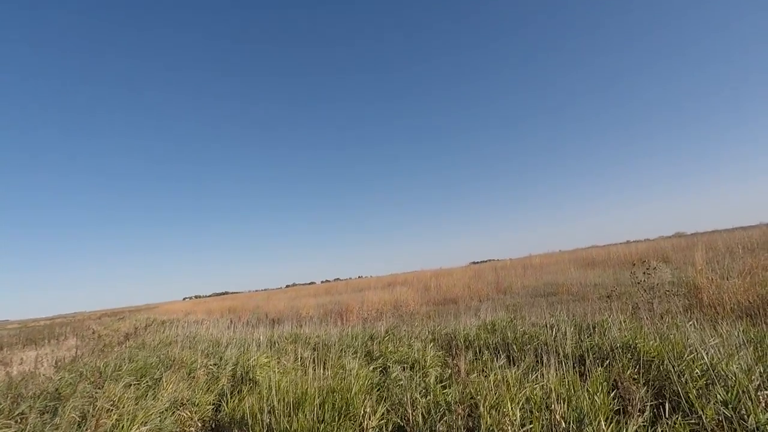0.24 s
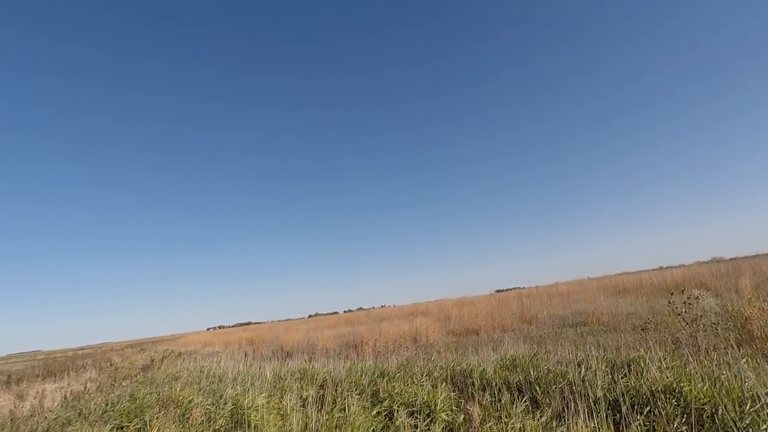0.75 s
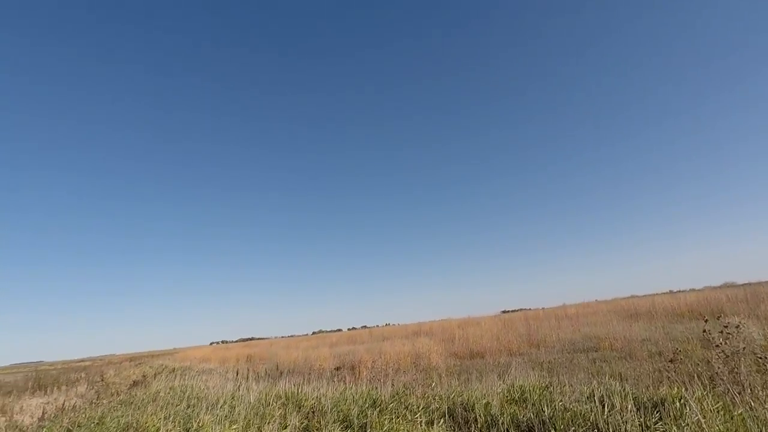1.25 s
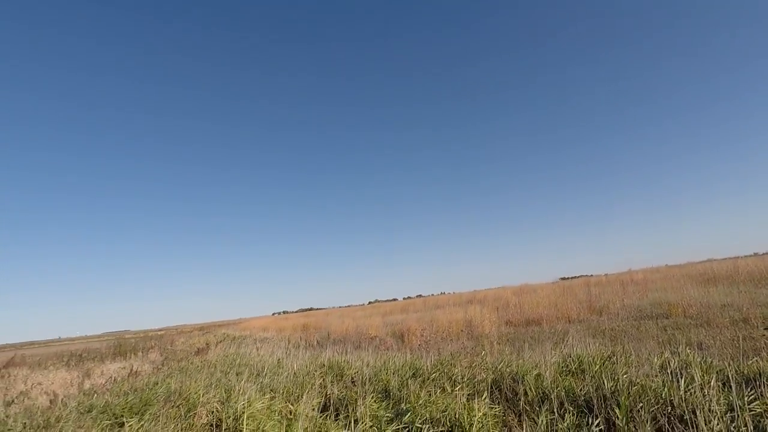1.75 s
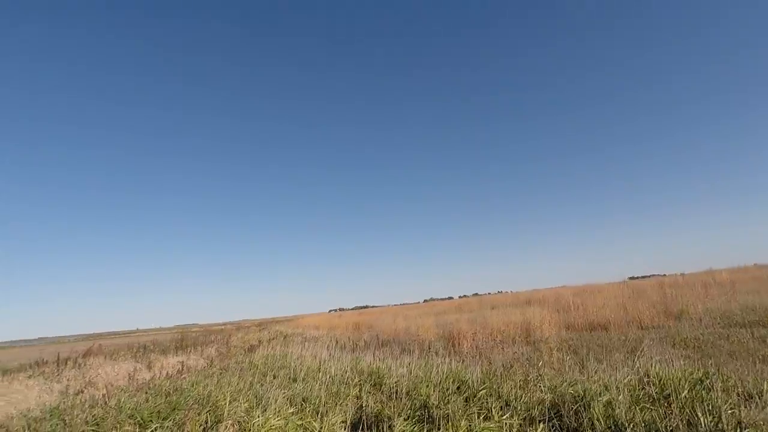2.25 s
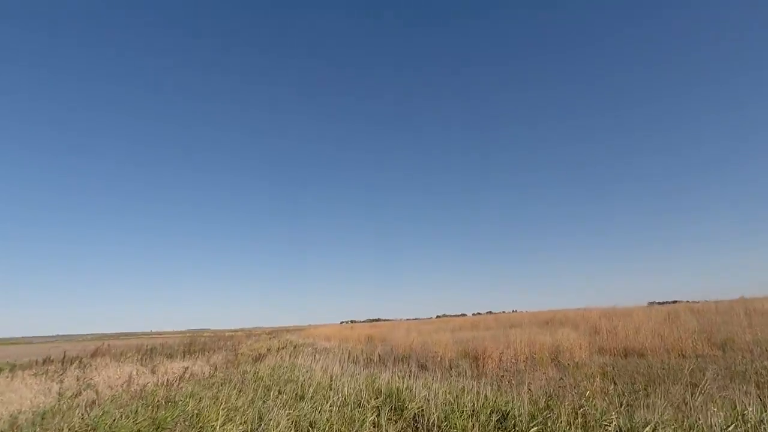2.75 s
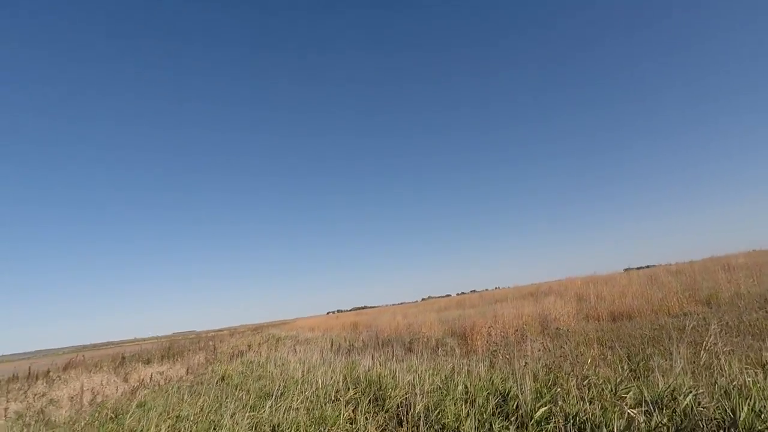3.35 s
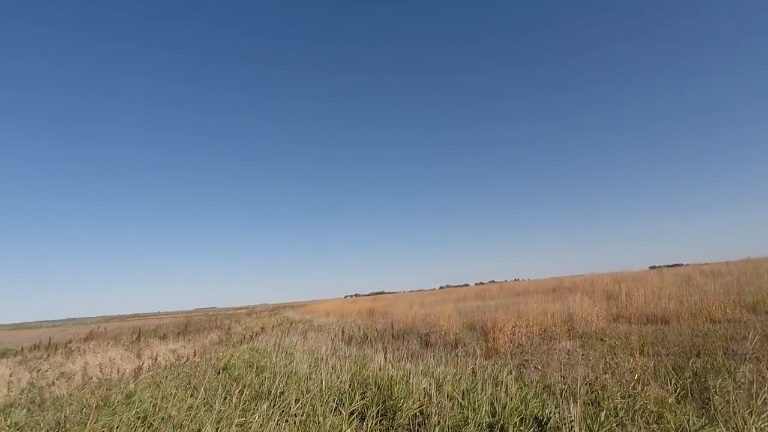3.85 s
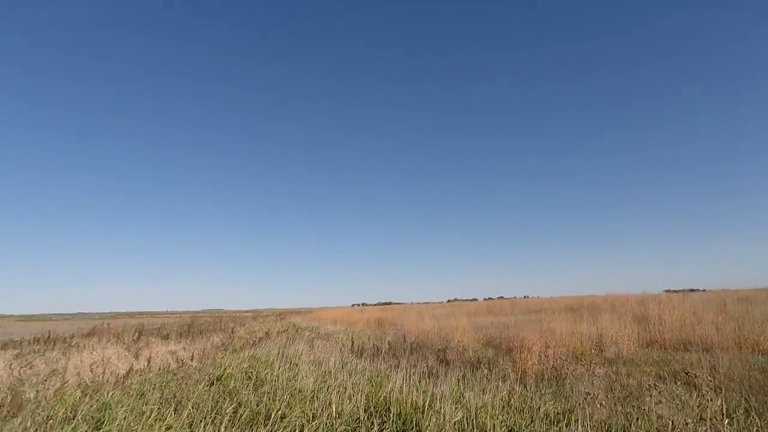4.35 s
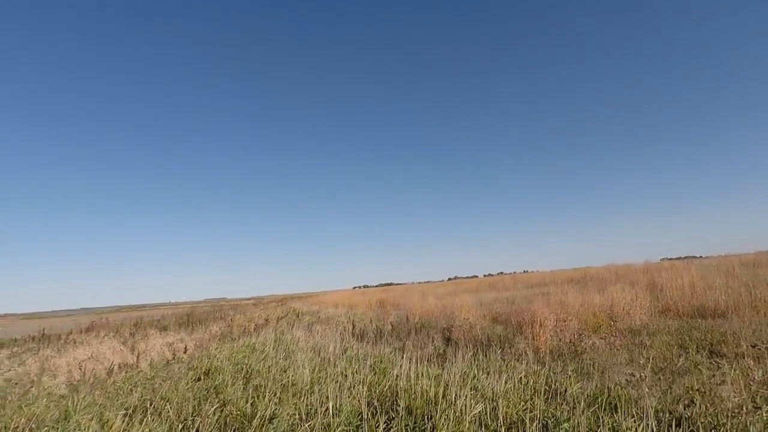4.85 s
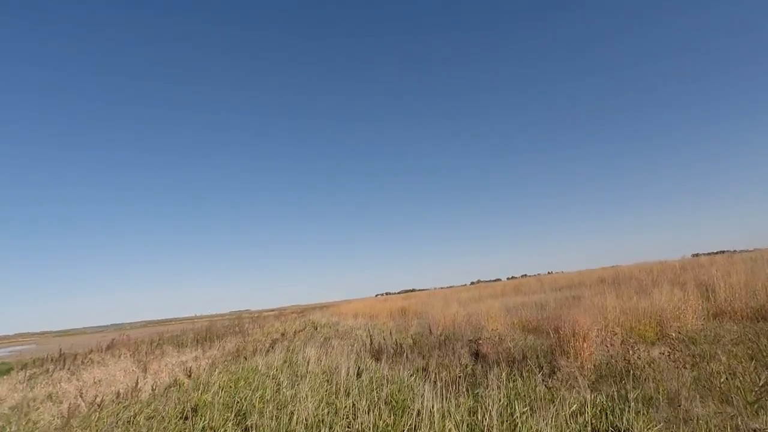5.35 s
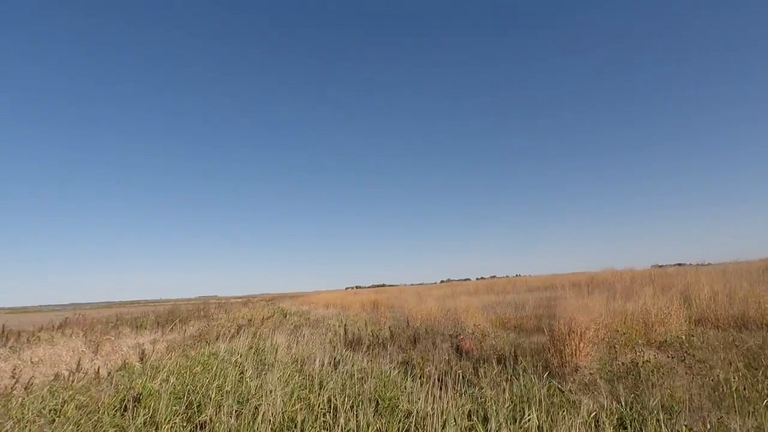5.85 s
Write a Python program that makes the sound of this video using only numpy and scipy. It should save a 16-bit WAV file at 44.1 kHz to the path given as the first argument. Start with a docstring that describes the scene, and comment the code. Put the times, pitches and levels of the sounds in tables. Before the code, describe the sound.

A person wades through tall dry grass in an open field, with a carried camera's microphone very close. Deep, soft-edged thuds mark heavy steps about every 0.8 seconds, each with a faint crunch of stems. Thin, crisp rustling never stops and swells as legs brush tufts between steps. Low gusts rumble and flutter on the microphone, its mount knocks dully, and occasional stalks snap. Dry, no echo.

```python
"""Tall dry grass rustles without pause over a low rumble of air as someone wades through an open field.
Random contacts, coloured by spectra, make blades, tips, stalks and litter; each leg brush swells them.
Gusts lift the rumble, flutter and whoosh of noise. Damped cosines knock the carried camera in its mount
and thud with each footfall, which also crunches dry stems; stalks snap as short bands of noise. No echo."""
import sys
import numpy as np
from scipy import signal
from scipy.fft import rfft, irfft, next_fast_len
from scipy.io import wavfile
from scipy.ndimage import uniform_filter1d

SR = 44100
rng = np.random.default_rng(int(sys.argv[2]) if len(sys.argv) > 2 else 0)


def transcribe(signal):
    """Save signal, clipped to [-1, 1], as a 16-bit WAV file at the path in sys.argv[1]."""
    frames = np.atleast_2d(signal).T
    limited = np.clip(frames, -1, 1)
    pcm = np.round(limited * 32767).astype(np.int16)
    wavfile.write(sys.argv[1], SR, pcm)


N = 268921
T = np.arange(N) / SR

# Thickness of growth along the path. Each row: time in s, level of its steady blade rustle in dB.
GROWTH = [(0, -69), (.35, -69.5), (1.3, -67.5), (2, -67.5), (2.75, -65), (3.65, -66), (4.4, -66),
          (5.4, -67.5), (6.1, -68)]
# Footfalls. Each row: full weight in s, thud peak in dB, thud pitch in Hz, build-up in s, settling in s,
# heel knock in dB, sole bump in dB, crunch in dB.
STEPS = [(1.044, -4, 32.5, 0.024, 0.026, -26.5, -30.5, -60.5),
         (1.895, -10, 33, 0.027, 0.013, -23, -34, -67),
         (2.011, -16.5, 30, 0.037, 0.041, -29.5, -39.5, -61.5),
         (2.611, -3, 31.4, 0.022, 0.025, -21, -38, -56), (3.438, -3, 34.1, 0.025, 0.032, -21, -32.5, -54.5),
         (4.236, -4.5, 28.2, 0.02, 0.026, -23, -35.5, -59.5),
         (4.282, -10.5, 38, 0.0068, 0.02, -33, -35, -61),
         (5.088, -3, 33.3, 0.024, 0.035, -22.5, -32.5, -56),
         (5.884, -6.5, 27.5, 0.028, 0.044, -30, -29, -66)]
# Spectrum of flutter and sole bump. Each row: frequency in Hz, density in dB per Hz.
FLUTTER = [(35, -7.5), (60, 10.5), (85, -3.5), (120, -9), (160, -15), (215, -24), (500, -34), (1000, -41.5)]


def undb(db):
    """Decibels to gain."""
    return 10 ** (np.asarray(db) / 20)


def curve(rows):
    """Each column of a timed table, interpolated at every sample."""
    s, *columns = np.transpose(rows)
    return [np.interp(T, s, c) for c in columns]


def colour(x, points):
    """Give x a spectrum of (Hz, dB) points, with 12 dB per octave more fall outside them; rms 1."""
    size = next_fast_len(N)
    hz, db = np.transpose(points)
    f = np.maximum(np.fft.rfftfreq(size, 1 / SR), 1)
    gain = undb(np.interp(np.log(f), np.log(hz), db))
    skirts = np.minimum(f / hz[0], 1) ** 2 * np.minimum(hz[-1] / f, 1) ** 2
    y = irfft(rfft(x, size) * gain * skirts, size)[:N]
    return y / np.std(y)


def walk(rate_hz):
    """Smooth random drift that changes about rate_hz times a second; spread 1."""
    k = max(int(SR / rate_hz), 1)
    held = rng.standard_normal(N)[np.arange(N) // k]
    y = uniform_filter1d(held, k)
    return y / np.std(y)


def crackle(per_s, spread_db):
    """Tiny contacts at random moments, a few stronger than the rest."""
    hit = rng.random(N) < per_s / SR
    sign = rng.choice([-1, 1], N)
    strength = undb(spread_db * np.minimum(rng.exponential(size=N), 5))
    return hit * sign * strength


def swell(at_s, rise_s, fall_s):
    """A smooth Gaussian hump that peaks at the given time."""
    return np.exp(-((T - at_s) / np.where(T < at_s, rise_s, fall_s)) ** 2)


def eddies(points, hold_s):
    """Turbulent pressure whose strength is evened out over stretches longer than hold_s."""
    y = colour(rng.standard_normal(N), points)
    local_power = uniform_filter1d(y ** 2, int(hold_s * SR))
    return y / np.sqrt(local_power + 0.0013)


def sweep():
    """Levels in dB of blades, stalks and tips: the steady rustle of wading, and a swell for each brush."""
    # Legs brushing tufts. Each row: fastest moment in s, rise in s, fall in s, swish in dB,
    # stalk rub relative to it in dB, tip hiss relative to it in dB; grass() trims the last two.
    brushes = [(.07, .05, 0.067, -73.5, -2, 4), (.51, .07, 0.045, -69.5, 2.5, -7),
               (.8, 0.22, 0.083, -62, 0.5, -6), (1.02, 0.32, .07, -68, 2.5, 1),
               (1.62, 0.15, 0.16, -64.5, 5, 2.5), (1.83, 0.083, 0.067, -66.5, 2, 2.5),
               (2.105, 0.044, 0.059, -63.5, 6, -3), (2.34, 0.2, 0.18, -60.5, -2, -6.5),
               (3.1, .13, 0.25, -64.5, 4.5, -1), (3.41, .08, 0.083, -65, 2, -3),
               (3.7, 0.081, 0.045, -67.5, -5, -4), (3.87, 0.036, .04, -64.5, 0, -3),
               (4.02, 0.12, 0.21, -60, -5, -5.5), (4.645, 0.1, 0.078, -60.5, 2, -8),
               (4.84, 0.15, 0.11, -60.5, -5, -8.5), (5.04, 0.12, 0.11, -63.5, 0.5, -3),
               (5.669, 0.14, 0.14, -59.5, -3.5, -5), (5.9, 0.19, 0.16, -63.5, -10, -6)]
    growth_rub_db, growth_tips_db = 2.63, 0.05  # relative to the steady blades, before the same trims
    growth_db, = curve(GROWTH)
    humps = np.array([swell(at, rise, fall) ** 2 for at, rise, fall, *_ in brushes])
    swish_db, rub_db, tips_db = np.transpose(brushes)[3:]
    parts = [(growth_db, swish_db),
             (growth_db + growth_rub_db, swish_db + rub_db),
             (growth_db + growth_tips_db, swish_db + tips_db)]
    # powers add
    return [10 * np.log10(undb(steady) ** 2 + undb(peaks) ** 2 @ humps) for steady, peaks in parts]


def grass(swish_db, rub_db, tips_db):
    """Blades, tips and stalks scrape along the legs, with more contacts in a faster sweep."""
    # Spectra of blades, dry tips and stalks. Each row: frequency in Hz, density in dB per Hz.
    blade_spectrum = [(2500, -21), (4500, -18), (5600, 0), (6500, -1), (7700, -3), (8700, -12.5),
                      (10000, -22), (13000, -44)]
    tip_spectrum = [(6500, -11), (8500, -4), (9400, -3.5), (10400, -4), (11200, -9), (12500, -9.5),
                    (13700, -5.5), (14500, -11), (15300, -7.5)]
    stalk_spectrum = [(1500, -17), (2400, -14), (3000, -6), (3600, -1), (4500, -1.5), (5300, -6.5),
                      (7000, -15.5)]
    tips_trim_db, rub_trim_db = 2.5, -0.15
    speed = undb(swish_db - swish_db.max())
    blades = colour(crackle(per_s=2500 + 14000 * speed, spread_db=2.5), blade_spectrum)
    tips = colour(crackle(per_s=3000 + 14000 * speed, spread_db=1.0), tip_spectrum)
    stalks = colour(crackle(per_s=1500 + 7000 * speed, spread_db=2.0), stalk_spectrum)
    # tufts catch and slip, so the sweep is never quite even
    catch_db = 0.5 * walk(30)
    return (blades * undb(swish_db + catch_db + 0.8 * walk(30))
            + tips * undb(tips_db + catch_db + tips_trim_db)
            + stalks * undb(rub_db + catch_db + rub_trim_db + 0.53 * walk(25)))


def litter(rub_db):
    """Flattened dry stems shift, more as stalks drag over them; some spring back after heavy steps."""
    # Spectra of shifting litter and rebounding stems. Each row: frequency in Hz, density in dB per Hz.
    litter_spectrum = [(150, 2), (300, -1.5), (500, -1.5), (1000, -1), (1500, -1), (2000, 0), (2700, -1),
                       (3500, -11.5), (6000, -22)]
    rebound_spectrum = [(700, -14.5), (1500, -4.5), (2300, -5.5), (2800, -3.5), (3300, -21.5), (5000, -13)]
    litter_db, drag_db = 1, -9.5  # relative to the steady rustle, and to the dragging stalks
    rebound_db = -61.0  # relative to the thud
    growth_db, = curve(GROWTH)
    stir = np.hypot(undb(growth_db + litter_db), undb(rub_db + drag_db))
    shifting = colour(crackle(per_s=3000, spread_db=0.5), litter_spectrum) * stir * undb(1.0 * walk(27))
    releases = [undb(thud_db + rebound_db) * swell(at + .11, 0.084, 0.14) for at, thud_db, *_ in STEPS]
    rebounding = colour(crackle(per_s=1700, spread_db=1.5), rebound_spectrum)
    return shifting + np.max(releases, axis=0) * rebounding


def air():
    """Slow eddies rumble on the microphone, more in gusts; flutter and whoosh rise with them."""
    # Gusts, mostly as the body swings into the next step.
    # Each row: start in s, end in s, rumble in dB, added in power to the breeze.
    gusts = [(0.14, 0.401, -30.5), (.74, .87, -37.5), (1.153, 1.42, -36), (1.493, 1.81, -39.5),
             (2.153, 2.384, -33.5), (2.415, 2.893, -31.5), (3.003, 3.067, -26.5), (3.23, 3.367, -24.5),
             (3.52, 3.735, -37), (3.857, 4.083, -35.5), (4.122, 4.41, -30.5), (4.795, 5.172, -32),
             (5.44, 5.627, -38), (5.708, 6.034, -31.5)]
    # Spectra of rumble and whoosh. Each row: frequency in Hz, density in dB per Hz.
    rumble_spectrum = [(10, -51), (20, -9), (32, 1), (45, -5.5), (60, -10), (85, -39), (150, -57)]
    whoosh_spectrum = [(200, -1.5), (330, -1), (600, -7), (1200, -15)]
    breeze_db, gust_edge_s = -40.5, 0.026
    whoosh_db = -41.5  # relative to the rumble
    power = undb(breeze_db) ** 2
    for start, end, db in gusts:
        outside_s = T - np.clip(T, start, end)
        gust = undb(db) * np.exp(-(outside_s / gust_edge_s) ** 2)
        power = power + gust ** 2
    rumble_db = 10 * np.log10(power) + 1.13 * walk(24)
    flutter_db = -56 + 0.43 * (rumble_db - breeze_db) + 1.4 * walk(15)
    rumble = eddies(rumble_spectrum, hold_s=.06) * undb(rumble_db)
    flutter = eddies(FLUTTER, hold_s=0.0526) * undb(flutter_db)
    whoosh = colour(rng.standard_normal(N), whoosh_spectrum) * undb(rumble_db + whoosh_db + 1.3 * walk(40))
    return rumble + flutter + whoosh


def knock(at_s, db, hz):
    """A heavily damped jolt of about one cycle."""
    return undb(db) * swell(at_s, 0.45 / hz, 0.83 / hz) * np.cos(2 * np.pi * hz * (T - at_s))


def knocks():
    """The camera shifts in its mount with the stride."""
    # Each row: time in s, peak in dB, pitch in Hz.
    mount_shifts = [(0.256, -30, 64), (0.291, -28.5, 92), (.84, -37, 78), (1.524, -34.5, 74.6),
                    (1.947, -28, 79), (2.035, -36, 77.5), (2.468, -27.5, 61), (2.719, -22, 52.4),
                    (2.997, -22.5, 56.5), (3.242, -26.5, 55.3), (3.328, -28.5, 83), (4.019, -34, 76),
                    (4.338, -27.5, 87.5), (4.912, -33.5, 84.5), (4.984, -28.5, 66.5), (5.162, -26.5, 54.4),
                    (5.683, -31, 74.5), (5.805, -34.5, 77.5), (5.958, -22, 52.6)]
    return sum(knock(at, db, hz) for at, db, hz in mount_shifts)


def snaps():
    """A dry stalk gives way in a short burst of splintering fibres; one breaks under every footfall."""
    # Stalks that snap or scuff. Each row: time in s, level in dB, centre in Hz, decay in s.
    stalk_breaks = [(0.2768, -51, 3620, 0.0036), (0.278, -52, 9700, 0.0088), (.39, -65, 400, 0.03),
                    (1.876, -55, 1900, 0.007), (1.936, -57, 1400, 0.0069), (2.236, -51.5, 3870, .012),
                    (2.432, -58, 3600, 0.0058), (2.47, -57, 1690, 0.013), (2.98, -60, 800, 0.039),
                    (3.353, -49, 2560, 0.0038), (3.5372, -46.5, 1000, 0.0048), (3.575, -59.5, 1400, 0.05),
                    (3.824, -56, 1500, 0.0054), (4.032, -53.5, 2110, 0.0074), (4.478, -57.5, 1490, 0.009),
                    (5.854, -49, 1600, 0.0053)]
    # a stem under the full weight; level relative to the thud
    break_db, break_lag_s, break_hz, break_decay_s = -49, .005, 1750, 0.0053
    underfoot = [(at + break_lag_s, thud_db + break_db, break_hz, break_decay_s)
                 for at, thud_db, *_ in STEPS]
    out = np.zeros(N)
    t = T[:SR // 5]
    for at, db, hz, decay in underfoot + stalk_breaks:
        edges_hz = np.clip([hz / 1.7, hz * 1.7], 100, .45 * SR)  # about an octave and a half
        band = signal.butter(2, edges_hz, "band", fs=SR, output="sos")
        fibres = signal.sosfilt(band, rng.standard_normal(len(t)))
        burst = undb(db) * fibres / np.std(fibres) * np.exp(-t / decay)
        start = int(at * SR)
        out[start:start + len(t)] += burst[:N - start]
    return out


def footfalls(heel_hz=70):
    """The heel knocks, the body's weight swings the camera slowly, and the sole flattens dry stems."""
    # Spectrum of crushed litter. Each row: frequency in Hz, density in dB per Hz.
    crunch_spectrum = [(150, -3), (280, -6.5), (500, 0.5), (900, -4.5), (1600, -2.5), (2600, -7),
                       (4000, -24), (9000, -13.5)]
    bump = eddies(FLUTTER, hold_s=0.038)
    stems = colour(crackle(per_s=3000, spread_db=3.5), crunch_spectrum)
    out = np.zeros(N)
    for at, thud_db, hz, rise, fall, heel_db, bump_db, crunch_db in STEPS:
        # the heel meets the ground half a swing before the full weight arrives
        out += knock(at - .5 / hz, heel_db, heel_hz)
        out -= undb(thud_db) * swell(at, rise, fall) * np.cos(2 * np.pi * hz * (T - at))
        out += undb(bump_db) * swell(at, 0.013, 0.018) * bump
        out += undb(crunch_db) * swell(at - .007, 0.03, 0.04) * stems
    return out


def scene():
    """All sources are close by, with no walls to answer them."""
    swish_db, rub_db, tips_db = sweep()
    growth = grass(swish_db, rub_db, tips_db) + litter(rub_db)
    return (growth + air() + knocks() + snaps() + footfalls())[None]


def record(dry):
    """The microphone port carves dips and peaks into the treble, and the recorder cuts the top."""
    # Port resonances. Each row: centre in Hz, width in Hz, gain in dB.
    port = [(1475, 74, 3.5), (2516, 154, 4), (2820, 114, -1), (3180, 58, -5.5), (3530, 275, 3),
            (4130, 190, -2), (4490, 140, 2.5), (5085, 203, -5.5), (6850, 120, -3.5), (8700, 440, -3),
            (9400, 240, 1.5)]
    top_hz = 15350
    size = next_fast_len(N + SR // 10)
    f = np.fft.rfftfreq(size, 1 / SR)
    port_db = sum(db * np.exp(-((f - hz) / width) ** 2) for hz, width, db in port)
    heard = irfft(rfft(dry, size) * undb(port_db), size)[:, :N]
    return signal.sosfilt(signal.ellip(12, .1, 90, top_hz, fs=SR, output="sos"), heard)


dry = scene()
out = record(dry)
transcribe(out)
```